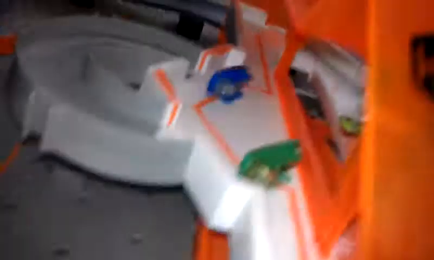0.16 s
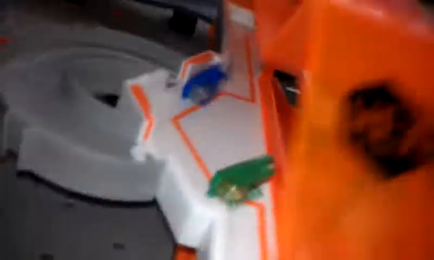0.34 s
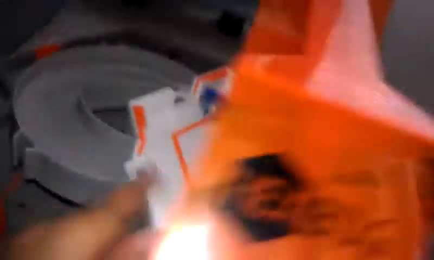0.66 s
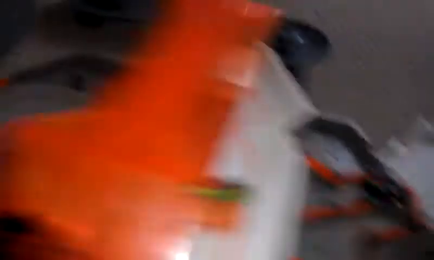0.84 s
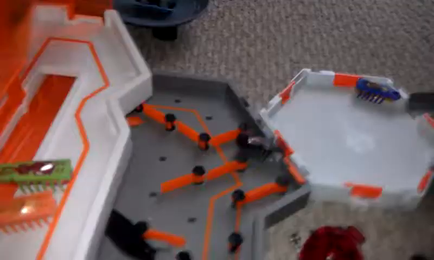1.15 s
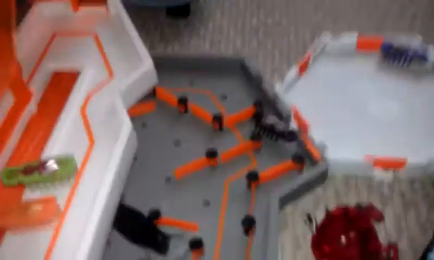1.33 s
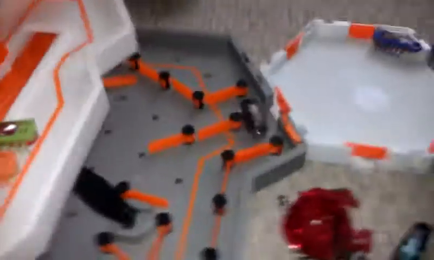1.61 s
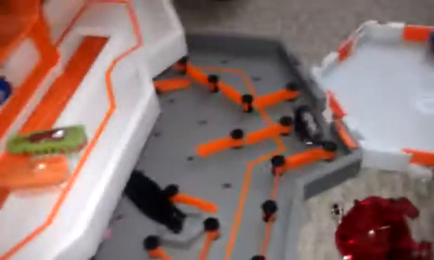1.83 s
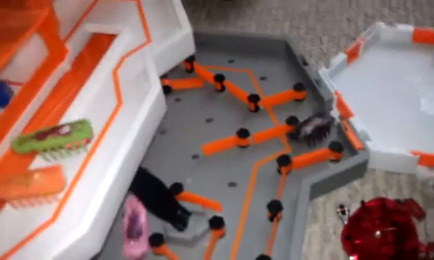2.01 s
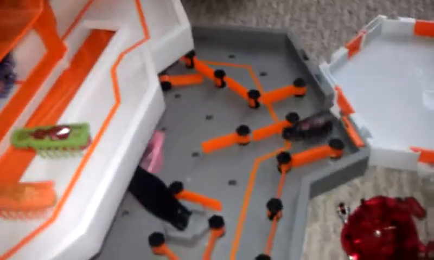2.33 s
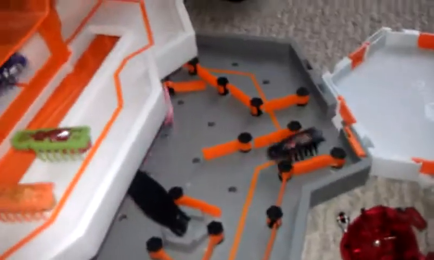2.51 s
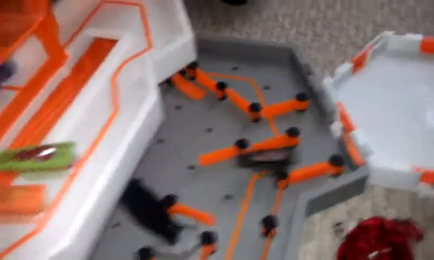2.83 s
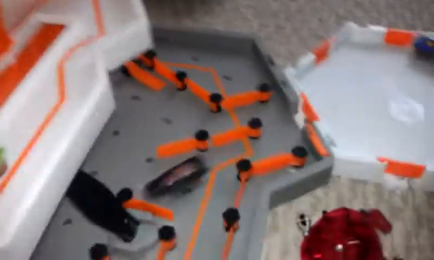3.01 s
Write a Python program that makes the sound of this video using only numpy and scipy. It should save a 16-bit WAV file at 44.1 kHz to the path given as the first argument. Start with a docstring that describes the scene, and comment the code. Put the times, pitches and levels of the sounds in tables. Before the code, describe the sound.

Rapid plastic clicking and rattling from little toy robots skittering around a track indoors.

```python
"""Small vibrating toy robots hop and knock about on a plastic track, close to a moving microphone.
First they knock on a hollow platform: each knock is a tick and a chatter of bounces that rings the
plastic. Meanwhile farther robots swell into a soft rattle over a low room hum. Between about 0.5 and
0.9 s the microphone turns to an open arena, where the knocks sound brighter until the end.
All along, microphone overload is heard as squashed peaks and brief, dull low pops."""
import sys
import numpy as np
from scipy import signal
from scipy.io import wavfile

SR = 44100
rng = np.random.default_rng(int(sys.argv[2]) if len(sys.argv) > 2 else 0)


def master_out(mix):
    """Clip the mix to full scale and print it as 16-bit PCM to the path in sys.argv[1]."""
    frames = np.transpose(np.atleast_2d(mix))
    ceiling = np.clip(frames, -1, 1)
    pcm = np.round(ceiling * 32767).astype(np.int16)
    wavfile.write(sys.argv[1], SR, pcm)


N = 138915
KNOCK_TIME_S = np.arange(2600) / SR  # the clock that runs during one knock


def gain_of(db):
    """Turn decibels into a number to multiply by."""
    return 10 ** (np.asarray(db) / 20)


def curve(points):
    """Join (time_s, value) points with straight lines across the scene."""
    t, value = np.transpose(points)
    return np.interp(np.arange(N) / SR, t, value)


def cut(x, hz, kind):
    """Keep the "low" or the "high" side of a sound, split at hz."""
    return signal.sosfilt(signal.butter(3, hz, kind, fs=SR, output="sos"), x)


def colour(x, points):
    """Shape a sound's tone with (pitch_hz, level_db) points; only the balance between them counts."""
    pitch_hz, level_db = np.transpose(points)
    hz = abs(np.fft.fftfreq(8192, 1 / SR))
    log_gain = np.interp(np.log(hz + 1), np.log(pitch_hz + 1), level_db) * np.log(10) / 20
    spectrum = np.exp(np.conj(signal.hilbert(log_gain)))  # nothing sounds before its hit
    taps = np.fft.ifft(spectrum).real[:4096]
    return signal.oaconvolve(x, taps / np.linalg.norm(taps))[:N]


def add(mix, start_s, sound):
    """Mix a sound in at its start time."""
    part = mix[round(start_s * SR):][:len(sound)]
    part += sound[:len(part)]


def echoes(x, fade_s):
    """The room throws back a blur of reflections that die away by 60 dB in fade_s."""
    t = np.arange(SR // 2) / SR
    taps = rng.standard_normal(len(t)) * gain_of(-60 * t / fade_s)
    return signal.oaconvolve(x, taps / np.linalg.norm(taps))[:N]


# Tone of the room's hum: pitch_hz, level_db
HUM_TONE = [(20, -27), (100, -18), (250, 5), (600, -21.5), (15000, -64)]
def room_hum(level_db=-55.5):
    """The room hums with a steady low noise."""
    return gain_of(level_db) * colour(rng.standard_normal(N), HUM_TONE)


# Tone of the far robots: pitch_hz, level_db
FAR_TONE = [(59, -106), (100, -57), (404, -9.5), (1240, -1), (1460, 3), (2240, -1.5), (3960, -7.5),
            (4310, -29), (4690, -6.5), (15600, -30)]
# How loud the far robots are: time_s, level_db
FAR_LOUDNESS = [(0, -44), (.6, -32), (1.2, -31.5), (1.8, -36.5), (2.4, -34), (3.15, -34.5)]
def far_rattle(taps_per_s=1400, spread_db=5):
    """Far robots make many faint taps, which distance smears into a rattle."""
    strength = gain_of(spread_db * np.minimum(rng.exponential(1, N), 4))
    taps = strength * (rng.random(N) < taps_per_s / SR)
    smear = colour(echoes(taps, fade_s=0.076), FAR_TONE)
    return gain_of(curve(FAR_LOUDNESS)) * smear / np.std(smear)


# Low pops of microphone overload: start_s, peak_db
OVERLOAD_POPS = [(.048, -36), (.078, -37), (.121, -44), (.274, -36), (.309, -41), (.398, -38), (.487, -39),
                 (.523, -41), (.579, -45), (0.798, -37), (.827, -40), (.899, -41), (0.976, -41),
                 (1.082, -43), (1.145, -52), (1.258, -39), (1.282, -34), (1.650, -45), (1.691, -45),
                 (1.933, -47), (2.026, -41), (2.217, -48), (2.250, -42), (2.507, -37), (2.711, -47),
                 (2.814, -47), (2.878, -48), (2.918, -43), (2.978, -49), (3.111, -41)]
def overload_pops(rise_s=0.00055):
    """Brief, dull low pops of microphone overload, with no ring, placed at the listed times."""
    age = np.arange(1200) / SR / rise_s  # 1 at the peak
    out = np.zeros(N)
    for start_s, peak_db in OVERLOAD_POPS:
        add(out, start_s, gain_of(peak_db) * age * np.exp(1 - age))
    return out


def chatter(level_db, chatter_s, bounces_per_s=400):
    """A robot lands, bounces and scrapes, fading 7 dB every chatter_s. Gives its hits and its hiss."""
    t = KNOCK_TIME_S
    chance, size, direction = rng.random((3, len(t)))
    scrape = rng.standard_normal(len(t))
    fade = gain_of(level_db - 7 * t / max(chatter_s, 0.002))
    strength = gain_of(-2 - 1.5 * np.log(size + 0.4))
    bounces = (chance < bounces_per_s / SR) * np.sign(direction - 0.5) * strength
    bounces[0] = gain_of(5.5)  # the first blow is the hardest
    hits = (bounces + gain_of(-19.5) * scrape) * fade
    flare_s, build_s = 0.00088, 0.0038  # the hiss flares at each bounce and takes a moment to build
    flares = signal.lfilter([1], [1, -np.exp(-1 / (flare_s * SR))], np.minimum(abs(bounces), 1))
    hiss = scrape * (0.58 + flares) * fade * np.minimum(t / build_s, 1)
    return hits, hiss


# Tone of the hiss, and of a tick in the open arena: pitch_hz, level_db
OPEN_TONE = [(40, -63), (200, -29.5), (600, -16.5), (1200, -8), (1600, -3), (2200, 6.5), (2550, 2),
             (3150, 2), (3850, -9.5), (4750, -14.5), (7000, -21.5), (10000, -30.5), (15700, -50)]
# Tone of a tick on the hollow platform: pitch_hz, level_db
HOLLOW_TONE = [(40, -64.5), (200, -13.5), (700, -23.5), (1100, 2.5), (1400, -0.5), (1700, 2), (2300, 1),
               (3200, -18.5), (4000, -4), (5000, -24.5)]
def ticks_and_hiss(hits, hiss, fizz, arena_share, hiss_from_hz=4776, fizz_from_hz=9320):
    """The bare sound of plastic on plastic: ticks at the bottom, hiss above them, fizz on top."""
    ticks = gain_of(6) * cut(hits, hiss_from_hz, "low")
    hiss = cut(cut(hiss, hiss_from_hz, "high"), fizz_from_hz, "low")
    fizz = cut(fizz, fizz_from_hz, "high")
    bright = colour(np.sqrt(arena_share) * ticks + hiss + fizz, OPEN_TONE)
    hollow = colour(np.sqrt(1 - arena_share) * ticks, HOLLOW_TONE)
    return bright + hollow


def shell_ring(hits, pitch_hz=4290, fade_s=0.02):
    """Every hit rings the robot's own shell on one bright note."""
    note = gain_of(-60 * KNOCK_TIME_S / fade_s) * np.sin(2 * np.pi * pitch_hz * KNOCK_TIME_S)
    return signal.oaconvolve(hits, note)[:N]


# Notes of the plastic track: pitch_hz, platform_db, arena_db, fade_s (time to drop 60 dB)
TRACK_NOTES = [(810, -10.5, -12.5, 0.029), (933, 4.5, -18.5, 0.032), (1050, 4, -4.5, 0.044),
               (1240, 11.5, -14, 0.022), (1334, 18, -4, 0.026), (1550, 10.5, -34.5, 0.035),
               (1870, -1, -9, 0.0051), (2020, 2, -10, 0.073), (2200, -11, 6, 0.029),
               (2370, 16, -28.5, 0.01), (2638, -24, 5, 0.045), (3003, -4, 4, 0.036),
               (3270, 12.5, 3.5, 0.025), (3620, 6.5, -15, 0.062), (5300, -14, -3.5, 0.024),
               (6480, -11, -3, 0.032)]
def track_ring(hits, ring_hz, arena_share, boost_db=10.5, width_octaves=0.08, rise_s=0.00033):
    """Each knock lands on its own spot, so it rings the track's notes in a new mix."""
    t = KNOCK_TIME_S
    pitch_hz, platform_db, arena_db, fade_s = np.transpose(TRACK_NOTES)[:, :, None]
    spot, detune = rng.standard_normal((2, len(TRACK_NOTES), 1))
    # Notes near ring_hz get louder, and the nearest moves right onto it.
    closeness = np.exp(-(np.log2(pitch_hz / ring_hz) / width_octaves) ** 2)
    mix_db = platform_db + arena_share * (arena_db - platform_db) + boost_db * closeness + 2.5 * spot
    tuned_hz = np.where(closeness == closeness.max(), ring_hz, pitch_hz * (1 + 0.01 * detune))
    notes = gain_of(mix_db - 60 * t / fade_s) * np.sin(2 * np.pi * tuned_hz * t)
    ring = notes.sum(0) * np.minimum(t / rise_s, 1) / np.linalg.norm(gain_of(mix_db))
    return signal.fftconvolve(hits, ring)


# Where the microphone points: time_s, arena_share (0 is the platform, 1 is the arena)
MIC_TURN = [(0, 0.022), (.45, 0.041), (.7, 0.33), (.9, 0.79), (1.3, 0.91), (2, 0.68), (2.5, 0.94),
            (3.15, 0.87)]
# Knocks of the near robots: start_s, level_db, ring_hz, hiss_db, chatter_s, shell_db
# The levels compare one knock with another; hiss_db and shell_db add to level_db.
NEAR_KNOCKS = [(0.001, -9, 1394, -14, 0.012, -27), (0.0247, -17.5, 1490, -14, 0.015, -17),
               (0.0466, -11, 1375, -16, 0.021, -20), (0.058, -11, 2360, -14, 0.0044, -22),
               (0.076, -13.5, 1440, -16, 0.019, -26), (0.11, -9, 1140, -18, 0.011, -10),
               (0.12, -10.5, 1360, -12.5, 0.0085, -25), (0.1243, -11, 1360, -21, 0.0071, -26),
               (0.134, -14.5, 1400, -14, 0.012, -14), (0.1495, -11, 1360.0, -12, 0.0058, -18),
               (0.162, -11.5, 1390, -14, 0.014, -25), (0.1857, -15, 1257, -17, 0.024, -26),
               (0.194, -7.5, 2320, -13, 0.0065, -23), (0.228, -9, 1440, -14.5, 0.012, -22),
               (0.257, -10, 1346, -16, 0.022, -20), (0.276, -4, 1360, -20, 0.0068, -24),
               (0.301, -17, 1240, -6, 0.0043, -21), (0.306, -8.5, 1230, -14, 0.01, -9),
               (0.349, -11, 964, -11.5, 0.0056, -22), (0.3584, -16, 1350, -14, 0.014, -27),
               (0.368, -12.5, 1340, -16, 0.0074, -8), (0.3843, -11, 1950, -10.5, 0.013, -9),
               (0.395, -8.5, 1240, -11, 0.0055, -22), (0.426, -12.5, 1340, -10, 0.014, -7),
               (0.4336, -20, 2300, -5, 0.008, -20), (0.452, -13, 1390, -11.5, 0.042, -22),
               (0.4716, -7.5, 2020, -13.5, 0.015, -10), (0.482, -7, 1250, -11, 0.0055, -8),
               (0.5161, -12.5, 1510, -8, 0.012, -22), (0.518, -18, 2370.0, -5, 0.009, -19),
               (0.529, -11.5, 1550, -14.5, 0.017, -14), (0.546, -15, 1440, -15, 0.0043, -18),
               (0.577, -9.5, 1320, -12, 0.014, -9), (0.5923, -15, 1830.0, -15, 0.013, -10),
               (0.6094, -12.5, 3250, -12, 0.015, -17), (0.618, -13.5, 2800, -10.5, 0.025, -10),
               (0.638, -15, 1970, -14, 0.012, -17), (0.649, -13, 2170, -36, 0.0073, -21),
               (0.669, -10.5, 2920, -19, 0.01, -8), (0.687, -12.5, 2260, -13.5, 0.015, -16),
               (0.701, -11, 2200.0, -13.0, 0.032, -6), (0.725, -15.5, 2850, -5.5, 0.012, -13),
               (0.744, -14, 2180, -11, 0.0077, -16), (0.7593, -11, 2200, -9.5, 0.013, -1),
               (0.784, -23, 1190, -19, 0.0044, -15), (0.791, -10.5, 2100, -9, 0.011, -8),
               (0.824, -12.5, 2130, -7, 0.0065, -13), (0.861, -11.5, 1970, -10.5, 0.012, -16),
               (0.8909, -10.5, 2190, -10, 0.015, -10), (0.8958, -9.5, 2170, -7, 0.0057, -11),
               (0.924, -28, 1320, -2, 0.0079, -2), (0.9314, -10.5, 2200, -13, 0.0047, -20),
               (0.937, -15, 2530, -10.5, 0.017, -5), (0.966, -12, 2200.0, -12, 0.014, -19),
               (0.974, -10, 2040, -8.5, 0.0074, -11), (0.9886, -7.5, 2700, -20, 0.0051, -7),
               (1.017, -14.5, 3260, -7, 0.0092, -16), (1.026, -11.5, 2200.0, -6.5, 0.008, -27),
               (1.0404, -6.5, 3260, -14, 0.0097, -12), (1.078, -11, 2200, -5.5, 0.0062, -9),
               (1.0818, -14, 2200, -14, 0.0051, -10), (1.109, -9.5, 2370, -12, 0.014, -13),
               (1.147, -8, 2200.0, -15.5, 0.01, -12), (1.181, -10.5, 2160, -11, 0.012, -8),
               (1.2053, -13.5, 2060, -8.5, 0.02, -14), (1.224, -12.5, 4300, -18, 0.014, -5.5),
               (1.238, -9, 2390, -16.0, 0.0071, -15), (1.2456, -15, 3360, -1, 0.0053, -11),
               (1.2547, -16, 2310, -21, 0.0058, -10), (1.2586, -17, 2900, 1, 0.0054, -2),
               (1.2736, -8.5, 3270, -15, 0.013, -20), (1.2826, -13, 2300, -15.0, 0.0043, 0),
               (1.289, -14.5, 2560, -4.5, 0.0045, -19), (1.3036, -13, 2280, -7.5, 0.018, -27),
               (1.3151, -34, 2360, -26, 0.0097, -25), (1.316, -11, 2620, -11, 0.014, -5),
               (1.338, -17, 2600, -1, 0.0031, -21), (1.351, -13, 2700, -7, 0.0084, -26),
               (1.3577, -16, 2210, -3, 0.0046, 4), (1.374, -13.5, 2650, -3.5, 0.0051, -18),
               (1.382, -19, 3770, -8, 0.011, 3), (1.4049, -12, 2330.0, -6, 0.0081, -13),
               (1.422, -11, 2540, -4, 0.011, -6), (1.448, -11.5, 2240, -4.5, 0.0064, -5),
               (1.4517, -18, 2880, -17, 0.0073, -15), (1.4722, -13.5, 840, -26, 0.0097, -13),
               (1.4746, -11, 3570, -14, 0.02, -7), (1.499, -11.5, 2880, -10.5, 0.0084, -7),
               (1.52, -9, 2550, -5.5, 0.0038, -12), (1.549, -8.5, 2870, -5.5, 0.0077, -3),
               (1.567, -9, 1110, -14, 0.013, -11), (1.5699, -21, 2200.0, -18, 0.011, -15),
               (1.5904, -14.5, 2260, 0.5, 0.0058, -1), (1.597, -12, 3170, -2.5, 0.003, -6),
               (1.607, -18, 2530, -0.5, 0.0092, -19), (1.62, -16.5, 2600, -3, 0.011, -20),
               (1.641, -23, 2620, 3.5, 0.011, -17), (1.645, -8.5, 2900, -12, 0.0059, -6),
               (1.6564, -12, 2220, -10.5, 0.0096, -17), (1.681, -19, 2270, -1.5, 0.02, -10),
               (1.693, -15.5, 2170, -26, 0.015, -3), (1.7058, -13.5, 2170, -9, 0.014, -20),
               (1.7257, -17, 3100.0, -1, 0.012, -18), (1.733, -13, 2960, -4, 0.012, -5),
               (1.7575, -16.5, 2200, -3.5, 0.0051, -21), (1.768, -20.5, 3140.0, 4, 0.0089, -17),
               (1.776, -15.5, 2230, -11, 0.014, 3), (1.794, -13, 2620, -8, 0.028, -28),
               (1.813, -14, 4130, -2.5, 0.0038, -3), (1.8374, -18.5, 2180, -9, 0.014, -2),
               (1.8585, -14.5, 3100, -4.5, 0.01, -2), (1.882, -11.5, 2700, -7, 0.013, -13),
               (1.902, -15.5, 4290.0, -3, 0.012, -5), (1.919, -18, 2530, -36, 0.007, -19),
               (1.924, -11, 2400, -8, 0.011, -12), (1.9323, -1, 2480, -8, 0.0055, -2),
               (1.944, -19, 4280, -1, 0.0045, 3), (1.956, -18.5, 1050, -26, 0.0093, -22),
               (1.9732, -8.5, 2500, -11, 0.015, -6), (1.9854, -9, 3020, -7, 0.0038, 2),
               (2.0123, -15.5, 3020, -3, 0.007, -3), (2.0244, -17, 2150, -4.5, 0.015, 0),
               (2.0428, -13.5, 2320, -5.5, 0.01, -18), (2.049, -13, 2370, -9.5, 0.017, -7),
               (2.073, -11, 3000, -12, 0.012, -5), (2.0824, -15.5, 2010, -6, 0.01, -11),
               (2.098, -14, 2220, -4, 0.0055, -6), (2.107, -12, 3040, -4.5, 0.0063, -12),
               (2.1253, -19, 1127, -31, 0.0067, -19), (2.1473, -10.5, 2670, -10.5, 0.01, -10),
               (2.1612, -17, 2320, -15, 0.003, -14), (2.168, -17.5, 2150, -3, 0.0051, 0),
               (2.19, -12, 3290, -9, 0.015, -1.5), (2.2174, -12.5, 2014, -7.5, 0.016, -14),
               (2.224, -24, 2200, -6, 0.008, -7), (2.2466, -15.5, 2200.0, 0.5, 0.0047, -1),
               (2.2507, -8.5, 2620, -8, 0.0058, -14), (2.2707, -10.5, 3230, -12, 0.0076, -13),
               (2.2803, -12.5, 3200, -7.5, 0.0091, -1), (2.2898, -14.5, 2200, -10, 0.014, -19),
               (2.311, -9, 3180, -18.5, 0.013, -6.5), (2.3502, -17, 4340, 1.5, 0.0066, -3),
               (2.358, -10.5, 2400, -14.0, 0.014, -4), (2.362, -14, 2280, -2.5, 0.0076, -24),
               (2.377, -14.5, 3170, -3.5, 0.0086, -10), (2.402, -14, 3350, -4, 0.011, -19),
               (2.419, -12.5, 2110, -3, 0.0068, -5), (2.4304, -14, 3300, -7.5, 0.011, -8),
               (2.451, -10, 3230, -10, 0.0085, -5), (2.481, -15, 2270, -4.5, 0.0074, -3),
               (2.497, -11, 2370, -9, 0.015, -9), (2.5213, -10, 3040, -10, 0.006, -18),
               (2.539, -11, 3230, -6, 0.0056, -6), (2.5535, -14, 2200.0, -7, 0.0034, -9),
               (2.5587, -17, 2200.0, -18, 0.011, -18), (2.5627, -12, 2920, -6.5, 0.0057, -9),
               (2.5695, -11.5, 2920, -25, 0.0078, -4), (2.601, -11.5, 2880, -7, 0.01, -10),
               (2.626, -12.5, 3130, -22, 0.066, -15), (2.647, -18, 3350, -9, 0.0054, -16),
               (2.6504, -10, 3000, -7, 0.012, -14), (2.6883, -13.5, 2020.0, -7.5, 0.016, -6),
               (2.713, -13, 3110, -8, 0.023, -13), (2.7326, -11, 3150, -12, 0.0083, -19),
               (2.7585, -8.5, 3060, -13, 0.015, -19), (2.7894, -14.5, 3370, -11, 0.014, -20),
               (2.7965, -12.5, 3180, -9, 0.018, -14), (2.812, -11, 2200.0, -9.5, 0.011, -11),
               (2.832, -9.5, 2020.0, -14.5, 0.011, -14), (2.848, -11, 3370, -9, 0.0091, -7),
               (2.8722, -16, 2170, -4, 0.022, -15), (2.875, -11.5, 2200.0, -7, 0.0086, -8),
               (2.8896, -17, 3180, -17, 0.02, -29), (2.9, -17.5, 2730, -4.5, 0.015, -14),
               (2.9135, -6, 2700, -9.5, 0.0076, -8), (2.935, -29, 2740, -17, 0.0018, -23),
               (2.9435, -13.5, 2000, -5.5, 0.011, -12), (2.977, -9.5, 3160, -7.5, 0.014, -9),
               (2.987, -18.5, 2300, -3, 0.01, -19), (3.009, -11.5, 3130, -13, 0.017, -16),
               (3.026, -11.5, 2880, -4, 0.0088, -13), (3.0306, -12, 2820, -9, 0.0093, -16),
               (3.0363, -12, 2630, -9, 0.0088, -16), (3.062, -12, 2900, -10, 0.014, -14),
               (3.089, -20, 3260, -7, 0.0062, -13), (3.099, -11.5, 3630, -5, 0.011, -12),
               (3.108, -14, 2930, -5.5, 0.012, -15), (3.1408, -10.5, 2040, -8.5, 0.01, -16)]
def near_knocks():
    """Near robots hop on the track: each knock ticks, hisses and rings both track and shell."""
    arena_share = curve(MIC_TURN)
    track, all_hits, all_hiss, fizz, shell_hits = np.zeros((5, N))
    for start_s, level_db, ring_hz, hiss_db, chatter_s, shell_db in NEAR_KNOCKS:
        share = arena_share[round(start_s * SR)]
        hits, hiss = chatter(level_db, chatter_s)
        hiss *= gain_of(hiss_db + 18)
        hidden_db = 6.75 + 5.5 * (1 - share)  # the platform hides the shell's note
        fizz_db = 11.5 + 0.48 * (level_db + hiss_db)  # harder knocks are brighter
        add(track, start_s, track_ring(hits, ring_hz, share))
        add(shell_hits, start_s, hits * gain_of(shell_db - hidden_db))
        add(all_hits, start_s, hits)
        add(all_hiss, start_s, hiss)
        add(fizz, start_s, hiss * gain_of(fizz_db))
    rings = gain_of(-11.5) * track + shell_ring(shell_hits)
    rings = cut(rings, 450, "high")  # the rings carry no deep bass
    return rings + ticks_and_hiss(all_hits, all_hiss, fizz, arena_share)


def scene():
    """The background, the near knocks and their short room echo, in one channel."""
    knocks = near_knocks()
    room = gain_of(-21) * echoes(knocks, fade_s=0.048)
    return (room_hum() + far_rattle() + overload_pops() + knocks + room)[None]


def record(dry, ceiling=0.39, firmness=3.6, lowest_hz=15, highest_hz=15720):
    """The microphone's input squashes the loudest peaks, then drops the deepest bass and top treble."""
    drive = gain_of(-0.01) * dry / ceiling
    squashed = ceiling * drive / (1 + abs(drive) ** firmness) ** (1 / firmness)
    treble_cut = signal.firwin(1023, highest_hz, window=("kaiser", 9), fs=SR)
    return signal.oaconvolve(cut(squashed, lowest_hz, "high"), treble_cut[None], "same")


dry = scene()
out = record(dry)
master_out(out)
```